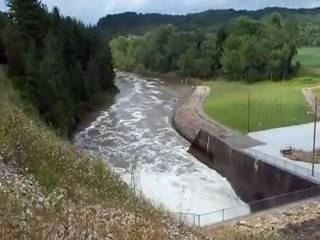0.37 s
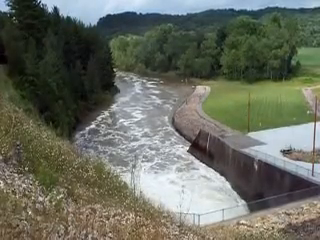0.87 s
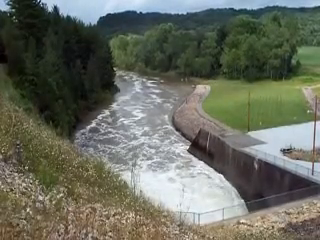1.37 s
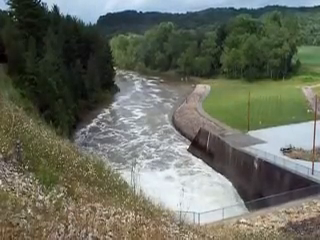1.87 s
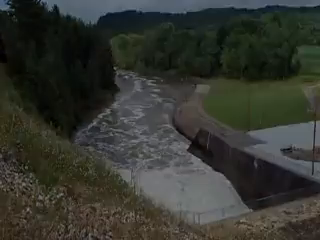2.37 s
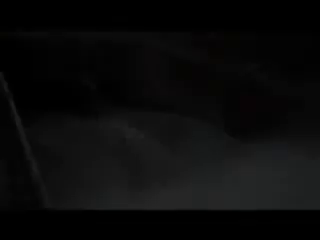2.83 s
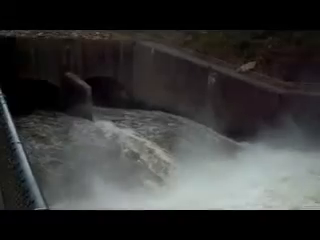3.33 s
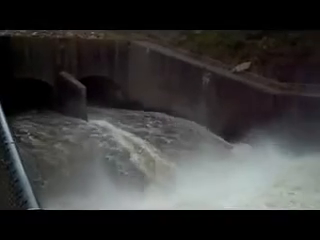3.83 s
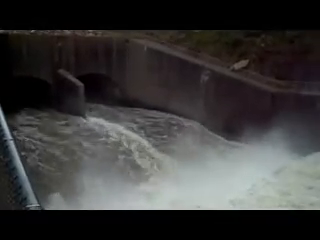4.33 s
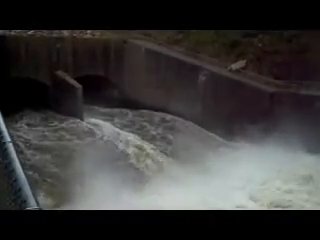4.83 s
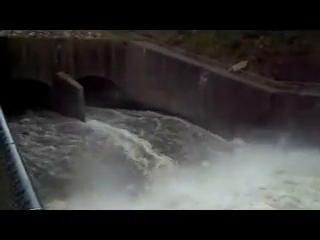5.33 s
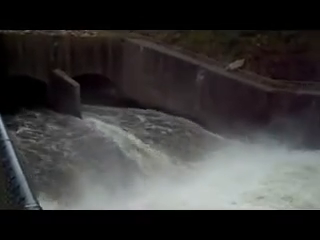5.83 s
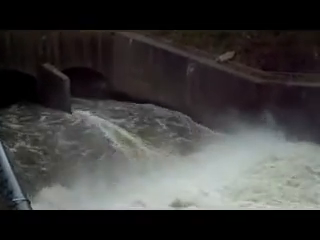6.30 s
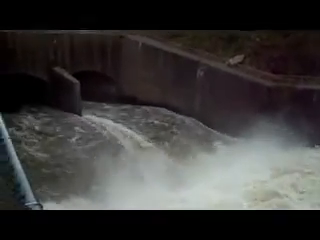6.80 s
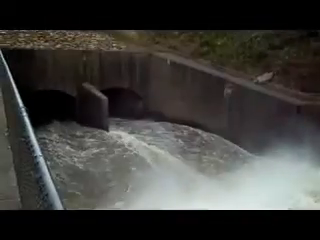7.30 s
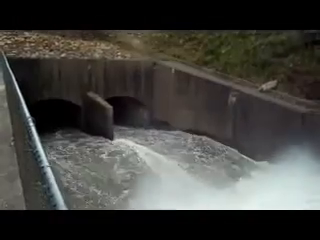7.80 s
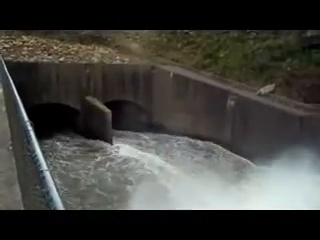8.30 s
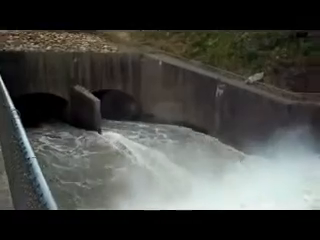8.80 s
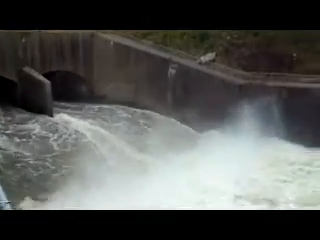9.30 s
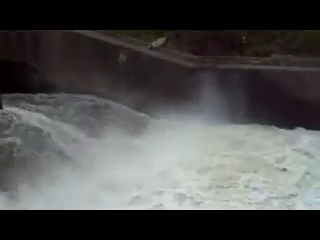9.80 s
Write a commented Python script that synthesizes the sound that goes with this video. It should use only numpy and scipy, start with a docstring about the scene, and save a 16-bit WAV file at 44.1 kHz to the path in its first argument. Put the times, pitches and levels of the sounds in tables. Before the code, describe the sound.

Outdoors below a dam, a faint, steady rush of whitewater is heard from up the bank, then fades to silence. Shortly after, the outlet roars from close by: it fades in, jumps abruptly louder once, then holds as a dense, nearly constant torrent, growing very slightly. The concrete walls give it a boxy low-mid colour. The sound is mono, with dulled top treble and a narrow hollow notch in the upper range.

```python
"""Whitewater below a dam outlet. First it is heard faintly from up the bank, holds, then fades to silence.
A moment later it is heard from the fence beside the concrete channel. This roar fades in, jumps up once
on the way, and then grows slowly. Both roars are patchy noise plus thousands of ringing bubbles, coloured
by the place, and their bass swells throughout. Two microphone capsules a few centimetres apart are added
together, which cancels the sound near 4.2 kHz; an empty gap with wavering edges lies there too."""
import sys
import numpy as np
from scipy import signal
from scipy.fft import rfft, irfft, next_fast_len
from scipy.io import wavfile
from scipy.ndimage import uniform_filter1d, map_coordinates

SR = 44100
rng = np.random.default_rng(int(sys.argv[2]) if len(sys.argv) > 2 else 0)


def field_ratio(decibels):
    """Amplitude ratio for a level in dB (20 dB per decade); scalars and array-likes work."""
    return 10 ** (np.asarray(decibels, dtype=float) / 20)


def unload_audio(sound):
    """Save the sound as a 16-bit wav file, at the path given as the first command line argument."""
    columns = np.transpose(np.atleast_2d(sound))
    # keep every value between -1 and 1, then stretch to whole-number steps
    steps = np.round(np.clip(columns, -1, 1) * 32767)
    wavfile.write(sys.argv[1], SR, steps.astype(np.int16))


N = 437031

# colour of the roar between the channel walls, with humps at 330 and 750 Hz: f/Hz, relative level per Hz/dB
NEAR_COLOUR = [(20, -28), (120, -12.5), (270, -1), (370, -1), (470, -6.5), (620, 1.5), (900, 0),
               (1150, -5.5), (2300, -3.5), (2700, -7.5), (3700, -4.5), (6100, -6.5), (6500, -9.5),
               (7400, -10), (7700, -16.5), (8000, -28.5), (8300, -50.5)]
# colour of the roar heard from the bank: f/Hz, relative level per Hz/dB
FAR_COLOUR = [(20, -31), (60, -9.5), (130, -3.5), (290, 0), (420, -5.5), (560, -1.5), (1000, -6),
              (1800, -6), (2100, -6), (3000, -8.5), (3700, -7.5), (5000, -10.5), (6000, -11), (7300, -13)]

# levels before the capsules are added
NEAR_DB, NEAR_STARTS_S = -20.5, 2.995  # the sound begins a little way into its fade
FADE_IN_FROM_S, FADE_IN_TO_S = 2.894, 4.915
JUMP_DB, JUMP_FROM_S, JUMP_TO_S = 6.5, 3.64, 3.75
GROWS_DB_PER_S = 0.2  # after the fade-in
FAR_DB, FADE_OUT_FROM_S, FADE_OUT_TO_S = -40.5, 1.05, 2.86
FAR_TOP_HZ = 7280  # the distant roar has nothing above this
BASS_HZ, BASS_SWELL_DB, BASS_KNOTS_PER_S = 450, 1.2, 1.472
CAPSULE_NULL_HZ = 4220  # the capsules lie half a wavelength apart here


def near_roar():
    """The roar beside the channel: dense water whose surges are slight, coloured by the concrete walls."""
    water = whitewater(NEAR_COLOUR, patchy_db=0.53, bubble_db=-11, surge_db=0.14)
    return near_gain() * water


def near_gain():
    """The close roar cuts in, fades up in a straight line with one jump, then grows slowly."""
    s = np.arange(N) / SR
    before_jump = 1 - ramp(JUMP_FROM_S, JUMP_TO_S)
    growth_db = GROWS_DB_PER_S * np.maximum(s - FADE_IN_TO_S, 0)
    db = NEAR_DB - JUMP_DB * before_jump + growth_db
    return field_ratio(db) * ramp(FADE_IN_FROM_S, FADE_IN_TO_S) * (s > NEAR_STARTS_S)


def whitewater(colour, patchy_db, bubble_db, surge_db):
    """Churning noise and bubbles, surging at two speeds, coloured by the place."""
    ringing = bubbles(count=15000, mid_hz=2504, octaves=1.295, cycles=1.85, spread_db=2)
    water = churn(patchy_db) + field_ratio(bubble_db) * ringing
    surge = field_ratio(surge_db * (wobble(7) + 0.56 * wobble(25)))
    return unit(filtered(surge * water, lambda hz: field_ratio(along(colour, hz))))


def churn(patchy_db):
    """White noise whose gain comes in patches of some 500 Hz by 80 ms, as eddies form and collapse."""
    cells = signal.stft(rng.standard_normal(N), nperseg=512)[2]
    patches = uniform_filter1d(rng.standard_normal(cells.shape), size=6, axis=0)  # along frequency
    patches = uniform_filter1d(patches, size=14, axis=1)  # along time
    patchy = cells * field_ratio(patchy_db * unit(patches))
    return unit(signal.istft(patchy, nperseg=512)[1][:N])


def bubbles(count, mid_hz, octaves, cycles, spread_db):
    """Trapped air pockets: each starts sharply, rings a few cycles and rises in pitch as it surfaces."""
    when, size = rng.random((count, 2)).T
    hz = mid_hz * 2 ** (octaves * rng.standard_normal(count))
    hz = np.clip(hz, 150, 9000)[:, None]
    t = np.arange(512) / SR
    age = t * hz / cycles
    # low bubbles last longer, so they start softer to leave the sum evenly coloured
    loud = field_ratio(-spread_db * np.log(size + 0.03))[:, None] * hz / mid_hz
    ring = loud * np.exp(-age) * np.sin(2 * np.pi * hz * t * (1 + 0.12 * age))
    where = (when * N).astype(int)[:, None] + np.arange(len(t))
    # add every ring into the sound at its own place
    return unit(np.bincount(where.ravel(), ring.ravel(), N + len(t))[:N])


def far_roar():
    """The same kind of water from up the bank: faint, without its highest treble, fading to silence."""
    water = whitewater(FAR_COLOUR, patchy_db=0.66, bubble_db=-12.5, surge_db=0.5)
    water = filtered(water, lambda hz: hz < FAR_TOP_HZ)
    return field_ratio(FAR_DB) * (1 - ramp(FADE_OUT_FROM_S, FADE_OUT_TO_S)) * water


def bass_swell(mono):
    """The bass rises and falls at random, leaving the rest alone."""
    bass = filtered(mono, lambda hz: 1 / (1 + (hz / BASS_HZ) ** 4))
    swell = field_ratio(BASS_SWELL_DB * wobble(BASS_KNOTS_PER_S))
    return mono + (swell - 1) * bass


def ragged(x, gap_waver_hz, top_waver_hz):
    """The edges of the empty gap and of the upper band limit waver from moment to moment."""
    hz, t, cells = signal.stft(x, SR, nperseg=2048)
    hz = hz[:, None]
    frames = np.minimum((t * SR).astype(int), N - 1)
    low, high, top = (wobble(18)[frames] for edge in range(3))
    # the numbers here are the mean edges in Hz
    gap = (hz > 4090 + gap_waver_hz * low) & (hz < 4350 + gap_waver_hz * high)
    kept = ~gap & (hz < 8230 + top_waver_hz * top)
    return signal.istft(cells * kept, SR, nperseg=2048)[1][..., :N]


def unit(x):
    """x scaled to an rms (average strength) of 1."""
    return x / np.sqrt(np.mean(x ** 2) + 1e-20)


def along(points, hz):
    """Reads a curve of (f/Hz, value) points, with frequency on a log axis."""
    f, v = np.transpose(points)
    return np.interp(np.log(hz + 1), np.log(f + 1), v)


def wobble(rate):
    """A smooth curve through random knots, rate of them a second (at most 40)."""
    knots = rng.standard_normal(int(N * 40 / SR) + 4)
    return map_coordinates(knots, [np.arange(N) * min(rate, 40) / SR])


def filtered(x, response):
    """Multiplies the spectrum of x by a response, given as a function of frequency in Hz."""
    m = next_fast_len(N + 8192)  # spare room keeps the end from wrapping onto the start
    return irfft(rfft(x, m) * response(np.fft.rfftfreq(m, 1 / SR)), m)[..., :N]


def ramp(from_s, to_s):
    """0 before from_s, 1 after to_s, straight between."""
    return np.clip((np.arange(N) / SR - from_s) / (to_s - from_s), 0, 1)


def scene():
    """The distant roar, then the close one, with swelling bass; both channels are the same."""
    mono = bass_swell(far_roar() + near_roar())
    return np.array([mono, mono])


def top_cut(x):
    """Nothing passes above the cut-off."""
    return signal.sosfilt(signal.butter(12, 8850, fs=SR, output="sos"), x)


def record(dry):
    """The later capsule adds a delayed copy, which carves a notch; then come the ragged edges."""
    summed = filtered(dry, lambda hz: 0.73 * (1 + np.exp(-1j * np.pi * hz / CAPSULE_NULL_HZ)))
    mix = ragged(summed, gap_waver_hz=55, top_waver_hz=45)
    return top_cut(mix)


dry = scene()
out = record(dry)
unload_audio(out)
```